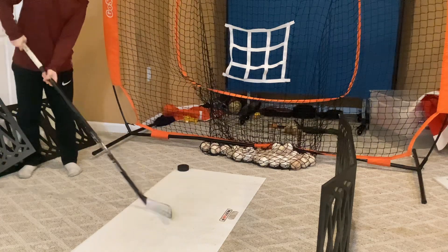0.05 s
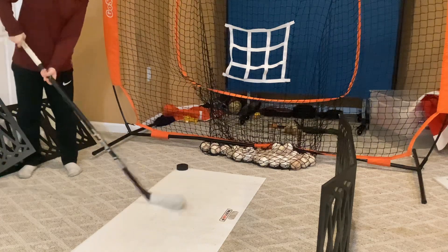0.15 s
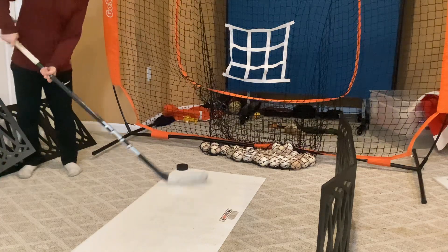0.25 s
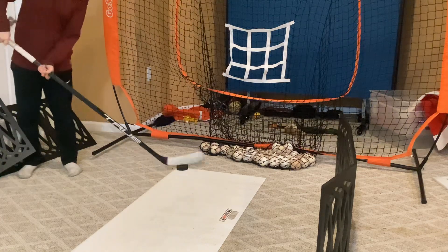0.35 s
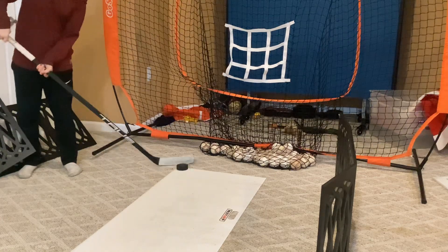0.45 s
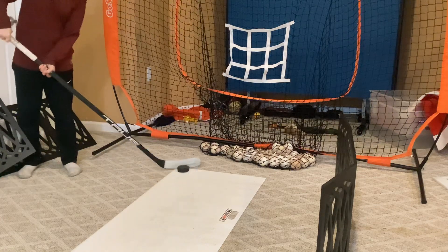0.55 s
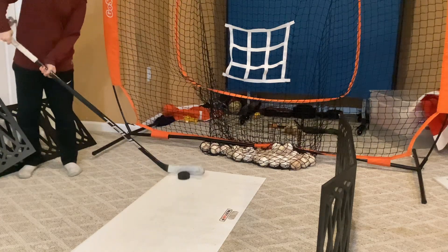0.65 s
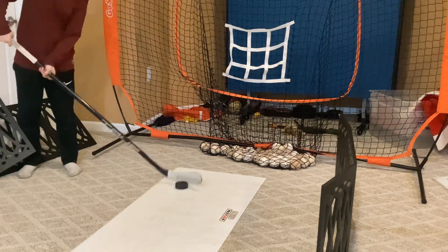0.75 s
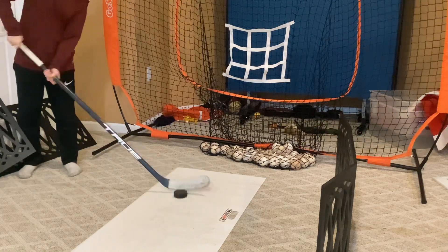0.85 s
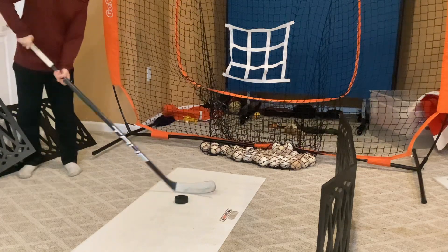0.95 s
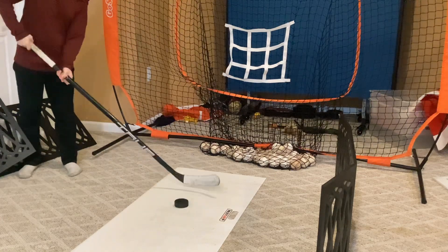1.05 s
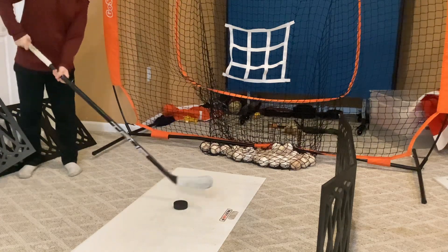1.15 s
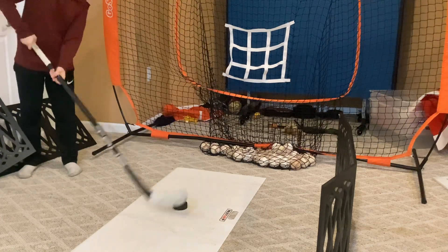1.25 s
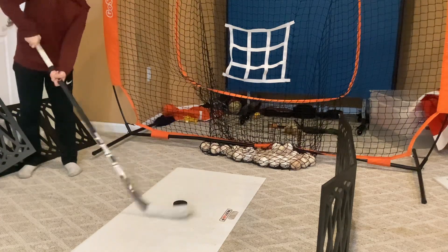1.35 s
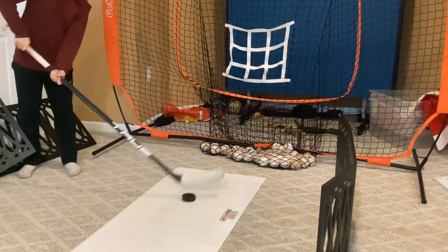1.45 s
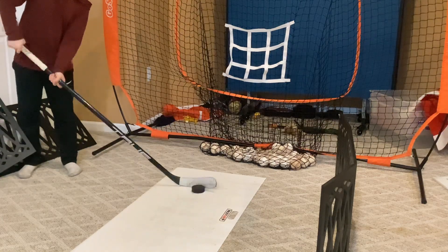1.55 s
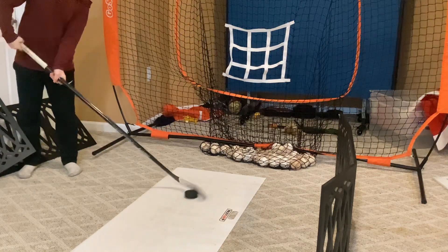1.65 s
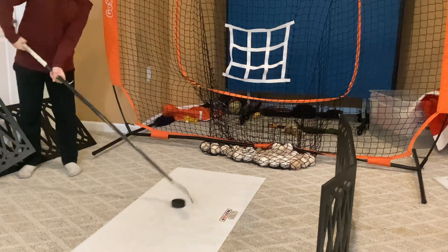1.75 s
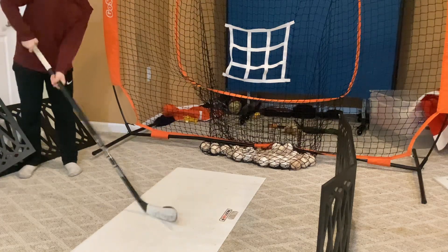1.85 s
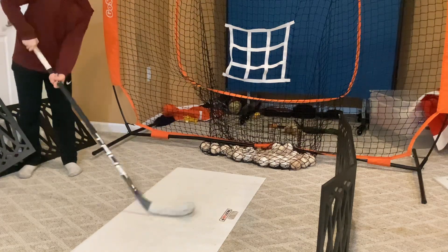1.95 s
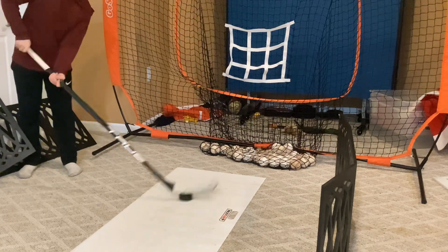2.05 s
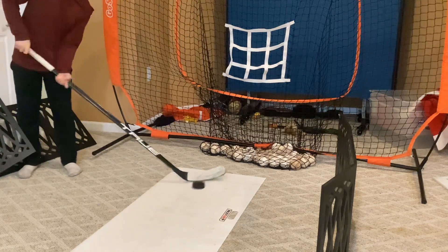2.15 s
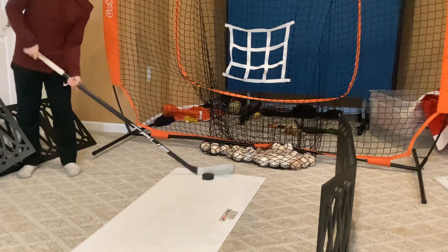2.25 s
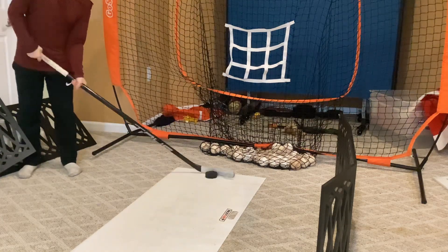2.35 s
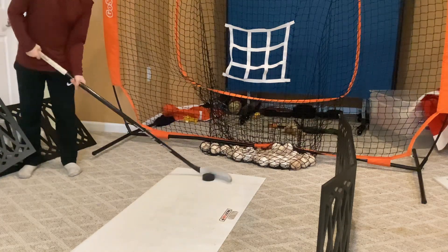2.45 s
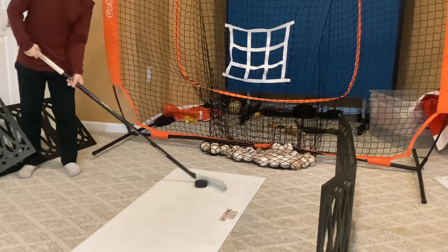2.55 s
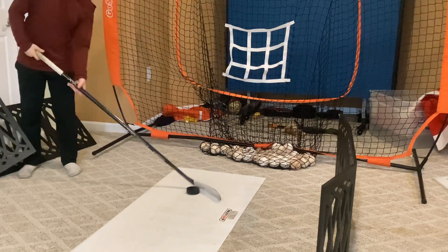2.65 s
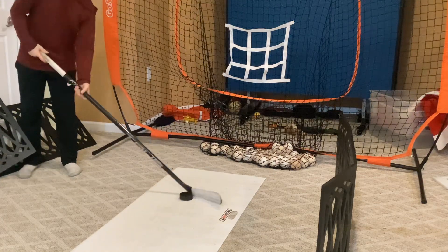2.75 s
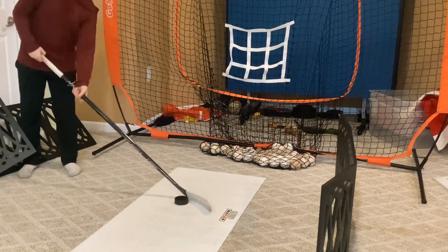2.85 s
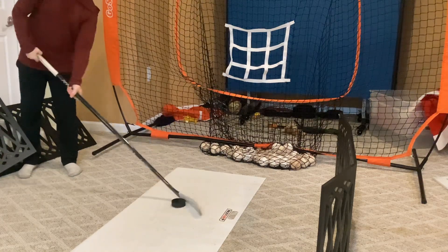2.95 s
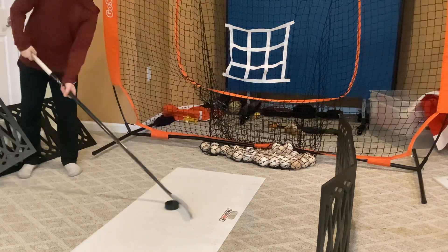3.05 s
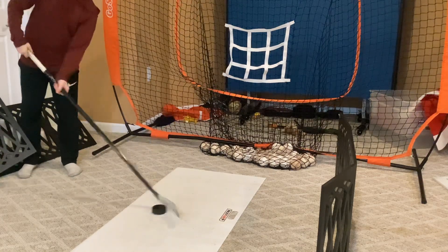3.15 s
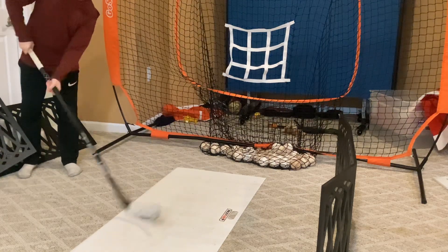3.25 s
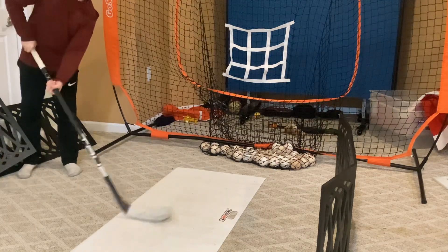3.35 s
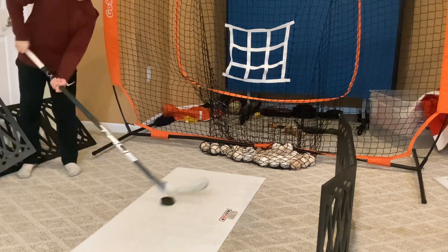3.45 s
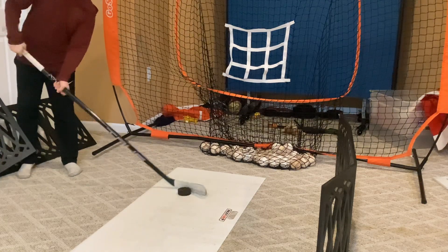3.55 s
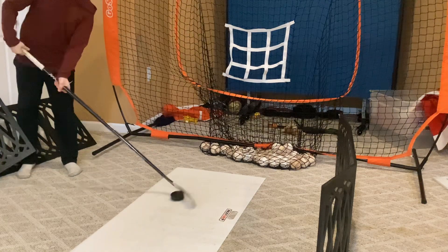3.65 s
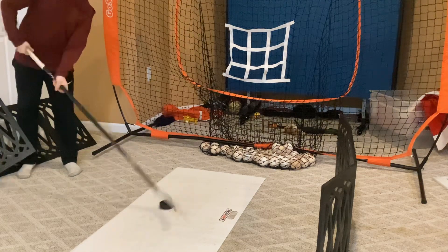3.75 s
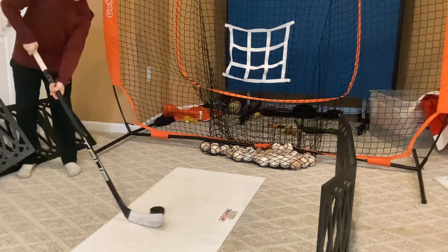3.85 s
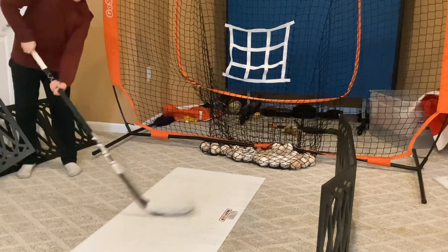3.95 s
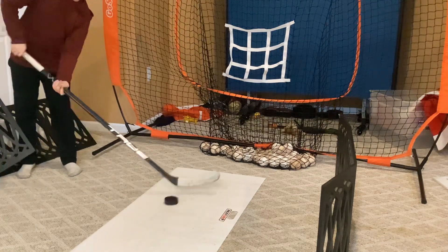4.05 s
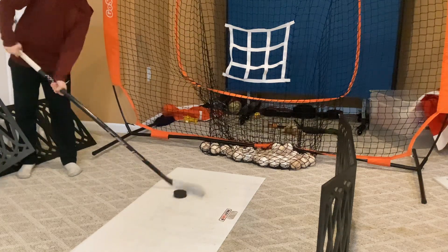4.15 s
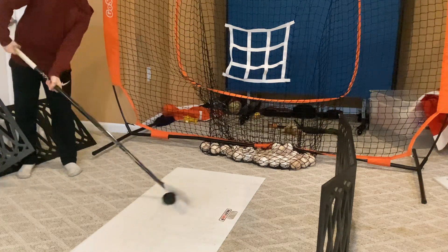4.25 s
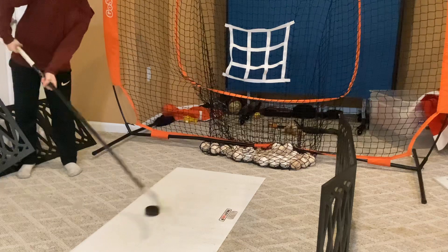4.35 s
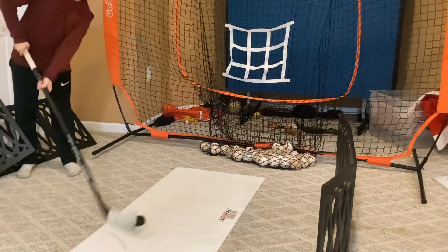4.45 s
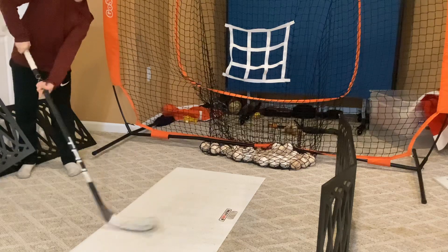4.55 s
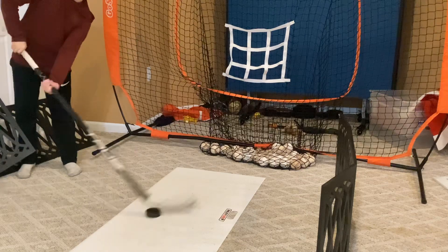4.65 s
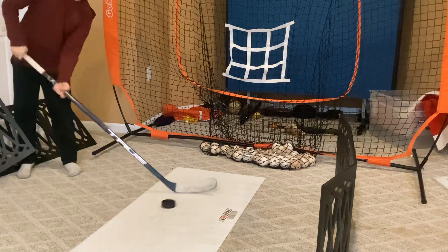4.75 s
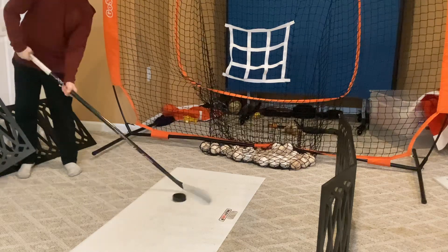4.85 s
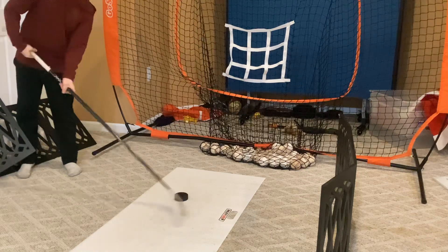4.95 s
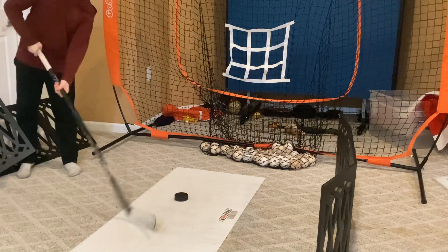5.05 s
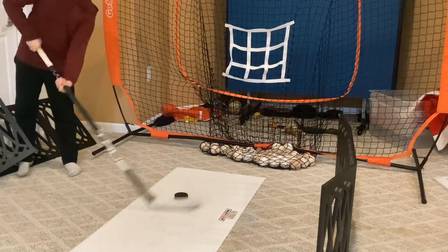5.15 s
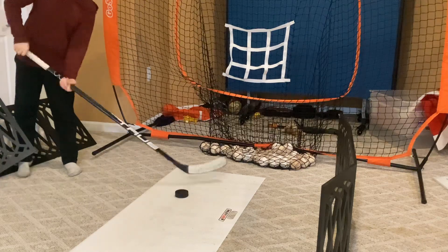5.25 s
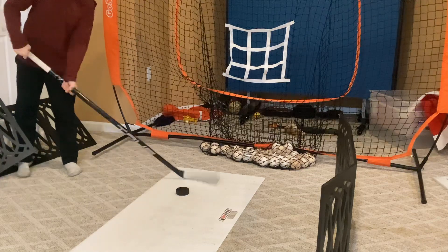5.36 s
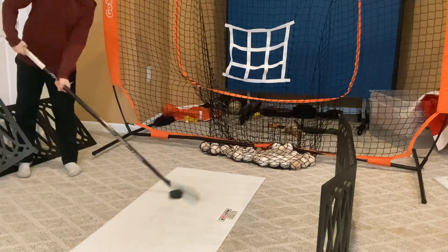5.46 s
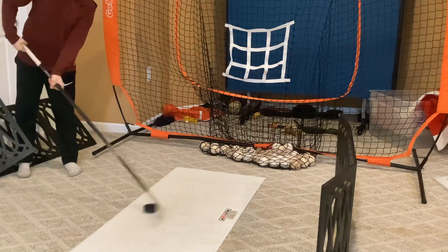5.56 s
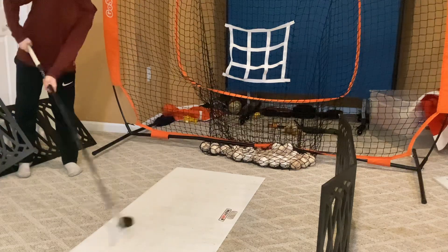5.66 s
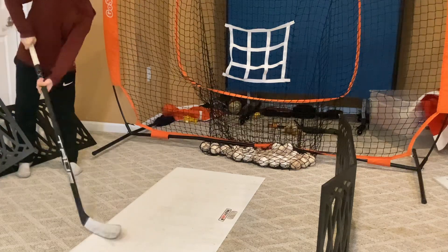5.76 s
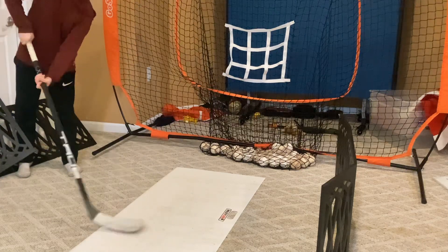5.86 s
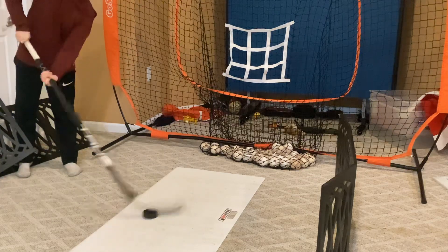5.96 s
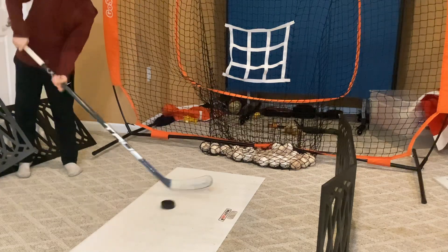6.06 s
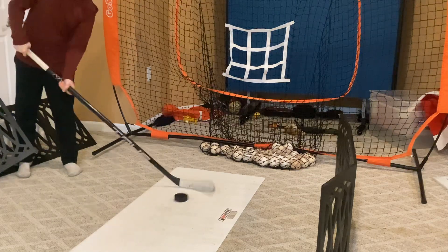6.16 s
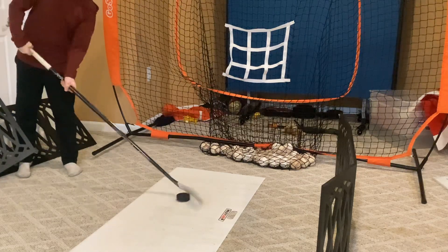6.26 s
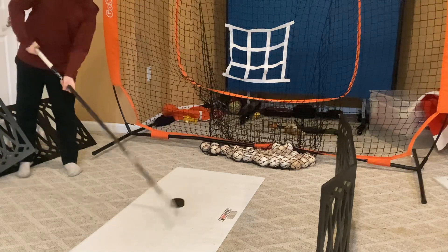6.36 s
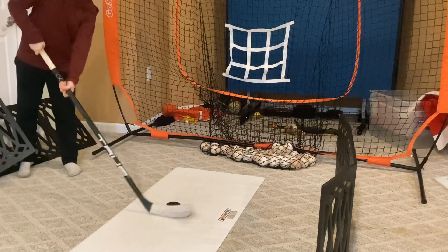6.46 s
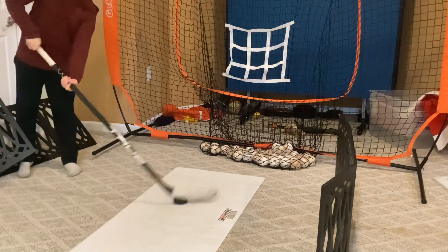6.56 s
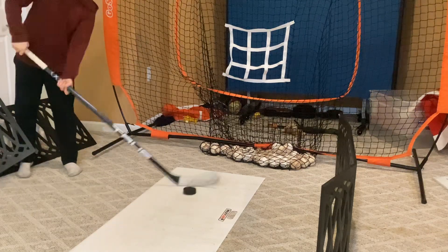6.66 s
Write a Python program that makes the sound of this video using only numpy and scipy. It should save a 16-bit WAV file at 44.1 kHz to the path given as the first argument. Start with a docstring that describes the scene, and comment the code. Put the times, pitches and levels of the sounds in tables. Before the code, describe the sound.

A hockey stick dribbles a puck on a plastic pad, heard from close by in a carpeted room with a short echo. It opens with faint sliding and a few light taps in the first second. From about 1.3 to 2.3 seconds come four firm slaps of the blade on the pad, each a bright crack with a low boom, most followed a moment later by a woody clack on the puck. A lull follows, with light ticks, quiet sliding and one faint, short rasp of the blade's edge near 2.8 seconds. At 3.3 seconds the slaps and clacks return, about three pairs a second in an uneven rhythm, and continue to a last strong slap near 6.7 seconds. Between blows, puck and blade hiss finely over the plastic and the wobbling puck bumps softly. A foot thuds gently on the floor, most noticeably around 4.8 seconds.

```python
"""Stickhandling in a carpeted room

One microphone, close to a plastic pad on which a hockey stick dribbles a puck from side to side.
The blade slaps the pad (a bright crack, then a low boom) and a moment later knocks the puck (a woody
clack); the room answers briefly. Between blows puck and blade slide with a fine hiss, the wobbling
puck bumps softly, and once the blade's edge rasps. Behind them a foot thuds softly on the floor."""
import sys
import numpy as np
from scipy import signal
from scipy.fft import rfft, irfft
from scipy.io import wavfile

SR = 44100
rng = np.random.default_rng(int(sys.argv[2]) if len(sys.argv) > 2 else 0)


def bounce(signal):
    """Save signal as a 16-bit WAV file at the path given by the first command-line argument."""
    frames = np.transpose(np.atleast_2d(signal))
    limited = np.clip(frames, -1, 1)
    pcm = np.round(limited * 32767).astype(np.int16)
    wavfile.write(sys.argv[1], SR, pcm)


N = 295470
SIZE = 32768  # samples in the buffer of one blow
HZ, AGE = np.fft.rfftfreq(SIZE, 1 / SR), np.arange(SIZE) / SR
# the first row is a knock's fading tail; the others are puck and blade sliding:
# t/s, length/s, level/dB, rub offset/dB, hiss offset/dB
SWELLS = [(-0.1, 0.096, -45, 2, -1), (0.43, 0.32, -56, 5.5, 2.5), (0.733, 0.16, -63.5, -4, 16.5),
          (1.0, 0.13, -62.5, -7, -2), (1.377, 0.17, -54.5, -1, 6.5), (1.592, 0.34, -52.5, -1.5, 1),
          (1.926, 0.26, -55, -2, 9), (2.396, 0.34, -47, -5.5, 0), (2.733, 0.27, -52, -4, -3),
          (3.02, 0.44, -60, 0, 2.5), (3.373, 0.22, -52.5, 4, 5.5), (3.586, 0.37, -53, 6, -1),
          (3.947, 0.15, -58, -3, 8), (4.197, 0.19, -51, 4, -15), (4.434, 0.42, -56, 1.5, 7),
          (5.225, 0.18, -53, -10, -1), (5.45, 0.34, -53, 0, 6), (5.83, 0.28, -55.5, -1, 6.5),
          (6.23, 0.38, -53.5, 9.5, -1), (6.52, 0.16, -55.5, -10, 3)]


def slaps_and_bumps(thump_db=-15, snap_db_per_db=0.5):
    """Blade slaps on the pad, and a few soft low bumps of the wobbling puck."""
    # t/s, strength/dB, bass/dB, brightness/dB, hardness/dB; the bumps are at 3.47, 3.79, 4.37 and 4.43 s
    pad_rows = [(0.1373, -24, 1, -4.5, 6), (0.775, -28, 8, -9, 4), (0.9349, -9.5, -2, -0.5, 2.5),
                (1.3461, 1, -1.5, 0.7, 1.5), (1.5565, 1, 3.5, 2, 4), (1.8821, 1.1, 0.5, -2.5, 0),
                (2.1952, -3.5, -1.5, 1, 2), (3.3134, 0, 0, -1.5, 0), (3.468, -26, 10, -5, 2),
                (3.5301, 2, 1, -0.6, -1), (3.7903, -33.5, 16, -12, 3), (3.8623, -2, 4.5, 0, -1),
                (4.1243, 1, 1.5, 1, 1.5), (4.3714, -24, 10, 0, 0), (4.4345, -24, 8, -8, 8),
                (4.517, 1, -1, -0.8, -0.5), (4.7903, 0, 0.5, 1.5, 2), (5.0978, -3.5, 3, 0.4, 6.5),
                (5.3378, 0.5, 0.8, 1.5, -6.5), (5.723, -3, -3, 2.5, 2), (6.12, -2.5, 0.5, 3.5, -1),
                (6.429, 1, -0.5, 2, 0.5), (6.692, 4, 0.5, -2, 3.5)]
    # spectra sent straight to the microphone (crack) and round the room (body): f/Hz, level/dB
    pad_crack = [(40, 2.5), (100, 4), (200, 23.5), (600, 15), (1100, 15.5), (1450, 10), (2200, 11),
                 (5800, 6), (9000, 3.5), (12000, 15.5), (14200, 17), (16000, 3)]
    pad_body = [(40, 2.5), (100, 21), (200, 31.5), (320, 25.5), (600, 22), (1100, 21), (1450, 15),
                (2200, 13), (5800, 10), (6600, 2.5), (9800, 4.5), (11500, 11.5), (13000, 8.5), (16000, -7)]
    out = np.zeros(N)
    for s, db, bass_db, bright_db, hard_db in pad_rows:
        add(out, s, pad_thump(thump_db + db + bass_db))
        tint_db = db + blow_colour(bass_db, bright_db, bright_db)
        # the top of the crack grows faster with strength than the rest
        edge_db = read([(6000, hard_db), (11000, snap_db_per_db * db)], HZ)
        add(out, *blow(s, read(pad_crack, HZ) + tint_db + edge_db - 3,
                       read(pad_body, HZ) + tint_db - 0.83,
                       lag_s=0.0011, grit_s=0.0003, grit_hz=4940, modal_share=0.47))
    return out


def knocks_and_rasp(peak_octaves=0.3):
    """Blade knocks on the puck, and one short rasp of the blade's edge near 2 kHz."""
    # t/s, strength/dB, bass/dB, bite/dB, fizz/dB, resonance f/Hz, its boost/dB; the rasp is at 2.78 s
    blade_rows = [(0.4, -22, -4, 2.5, -2, 1640, 4.9), (0.4518, -36.5, 10.5, 3, 20, 480, 16),
                  (0.5372, -9.5, -5.5, 0.3, -2, 1130, 7.5), (0.7972, -19, 9.5, -0.3, -9, 1640, 9.5),
                  (1.42, -0.1, -1.5, -0.4, -4, 1760, 2.5), (1.585, 1.5, -12, 4.5, 5, 1230, 11),
                  (2.3026, -4.5, -1, -2, -3, 1660, 3), (2.4065, -37, -5, 7, 15, 2900, 9),
                  (2.4763, -19, -3, 2, 9, 3300, 3), (2.5879, -24.5, 3.5, 0, 4, 1860, 11),
                  (2.779, -30.5, -22, 8.5, 2, 1730, 17), (3.3672, -2.5, -1.5, -6.5, 5, 3500, 10.5),
                  (3.583, 4.5, -8, -4, -20, 2670, 3.5), (3.9464, -2.5, 3, -1.5, 1.5, 1980, 4),
                  (4.202, 0.5, 2, -1, 6.5, 910, 6), (4.5534, -1.5, -30, 0.5, 0, 2800, -1.5),
                  (4.9188, -4.5, 4.5, 3, -9, 383, 2), (5.163, -18, -5, 5.5, 21, 4540, 8.5),
                  (5.2168, -6, 7.5, 0.5, -9, 580, 3), (5.4539, 1.5, 2.5, 1, 1.5, 600, 1.5),
                  (6.2432, 0.5, 3, 2, 7.5, 2300, -1), (6.518, -1.9, 2, -5.5, 1, 1520, 5)]
    # spectra sent straight to the microphone (crack) and round the room (body): f/Hz, level/dB
    blade_crack = [(40, -9.5), (210, 5), (650, 19.5), (1000, 19), (1500, 11.5), (2300, 15), (4200, 3),
                   (5800, -0.5), (10500, -8), (13000, -16), (16000, -32)]
    blade_body = [(40, -11.5), (100, 13.5), (210, 24), (350, 21), (650, 21), (1000, 22), (1500, 11),
                  (2300, 11.5), (4200, 1.5), (5800, 7), (6600, -3), (12000, -11), (16000, -34)]
    out = np.zeros(N)
    for s, db, bass_db, bite_db, fizz_db, peak_hz, peak_db in blade_rows:
        resonance_db = peak_db / (1 + (np.log2((HZ + 1) / peak_hz) / peak_octaves) ** 2)
        tint_db = db + resonance_db + blow_colour(bass_db, bite_db, fizz_db)
        hard_db = 1.5 + 0.32 * db  # a gentle touch only grazes: it loses more crack than ring
        add(out, *blow(s, read(blade_crack, HZ) + tint_db + hard_db - 1.34,
                       read(blade_body, HZ) + tint_db - 0.4,
                       lag_s=0.000616, grit_s=0.001, grit_hz=6700, modal_share=0.68))
    return out


def blow(s, crack_db, body_db, lag_s, grit_s, grit_hz, modal_share, modal_hz=1250, lead_s=0.002):
    """Start time and sound of a blow at the microphone: gritty contact, echoes, modes, reverberation."""
    impulse = np.exp(-2j * np.pi * HZ * lead_s)
    # the surfaces meet at many tiny points, which smears the highest treble in time
    grit = rfft(rng.standard_normal(SIZE) * np.exp(-abs(AGE - lead_s) / grit_s))
    contact = blend(impulse, evened(grit), HZ ** 2 / (HZ ** 2 + grit_hz ** 2))
    contact = evened(contact / np.sqrt(abs(contact) + 1e-3))
    crack = contact * causal(crack_db) * (1 + wall_echoes())
    # single modes stand out below modal_hz; above it they merge into a cloud
    tail = blend(reverberation(), ringing(), modal_share / (1 + (HZ / modal_hz) ** 8))
    body = impulse * tail * causal(body_db)
    # low bending waves travel slowest; lag_s is their delay near 1 kHz
    chirp = np.exp(-2j * np.pi * lag_s * 1000 * np.log(HZ + 100))
    return s - lead_s, irfft(chirp * (crack + body))[:SIZE * 3 // 4]


def blow_colour(bass_db, bite_db, fizz_db, ripple_db=3.5, ripple_hz=210):
    """A blow's tone in dB, rippled by the hollow blade's upper modes: each spot favours others."""
    tone_db = read([(260, bass_db), (550, 0), (1300, 0), (2100, bite_db), (5500, bite_db),
                    (10000, fizz_db)], HZ)
    knots = np.arange(0, SR / 2, ripple_hz)
    heights = np.minimum(rng.standard_normal(SIZE)[:len(knots)], 1.4)
    return tone_db + ripple_db * np.interp(HZ, knots, heights) * HZ ** 2 / (HZ ** 2 + 1000 ** 2)


def pad_thump(db, hz=210, swell_s=0.01225, width_s=0.0049, sag_octaves_per_s=25, spread=0.12):
    """The pad gives under a blow: a few low cycles that swell, sag in pitch and are gone."""
    pitch = hz * np.exp(spread * rng.standard_normal()) * 2 ** (-sag_octaves_per_s * (AGE - swell_s))
    swell = np.exp(-((AGE - swell_s) / width_s) ** 2)
    return amp(db) * swell * np.sin(2 * np.pi * np.cumsum(pitch) / SR)


def ringing(spread_db=4.0, detune=0.0052):
    """Spectrum of the modes a blow rings; their shares change with the spot that is struck."""
    # resonances of stick, pad and room: f/Hz, level/dB, t60/s
    mode_rows = [(75, -6, 0.6), (123.9, 4, 0.31), (178.2, -1, 0.37), (222.5, 3, 0.2), (254, 2.5, 0.2),
                 (350.4, 3.5, 0.19), (426.5, 4, 0.2), (456.6, 2.5, 0.22), (581, 0.5, 0.27), (601, 1, 0.17),
                 (699, -1, .3), (751, -7, 0.39), (812, 2, 0.2), (941, -1, 0.29), (972, 2.5, 0.23),
                 (1063, 4.5, 0.15), (1137, 3, 0.16), (1160, 9.5, 0.14)]
    hz, db, t60 = np.transpose(mode_rows)[:, :, None]
    size, shift = rng.standard_normal((2, len(mode_rows), 1))
    t = AGE[:SIZE // 2]
    sign = (-1) ** np.arange(len(mode_rows))[:, None]  # neighbours oppose, so the boom swells
    envelopes = amp(db + spread_db * size - 60 * t / t60)
    waves = sign * envelopes * np.sin(2 * np.pi * hz * (1 + detune * shift) * t)
    spectrum = rfft(waves.sum(0), SIZE)
    in_band = (HZ > hz.min()) & (HZ < hz.max())
    return spectrum / np.sqrt(np.mean(abs(spectrum[in_band]) ** 2))


def sliding():
    """Puck and blade rub, scrape and hiss on the pebbled plastic; the opening swell is a knock's tail."""
    # spectra of the three: f/Hz, relative density/dB
    rub_colour = [(90, -24), (200, 9.5), (350, 7.5), (600, 1.5), (1100, 2.5), (1600, -18.5), (3000, -35)]
    scrape_colour = [(700, -12), (1400, -0.5), (2000, 2), (2700, -2), (3600, -2.5), (5800, -7), (6500, -11),
                     (10000, -15.5)]
    hiss_colour = [(3000, -13.5), (5700, -4), (6500, -12), (10800, -5), (11700, 1), (13200, -1),
                   (14500, -1), (15600, -11.5), (16300, -37)]
    _, _, db, rub_db, hiss_db = np.transpose(SWELLS)
    rub = friction(rub_colour, catches_per_s=110, catch_share=0.65, judder_db=1.0)
    scrape = friction(scrape_colour, catches_per_s=750, catch_share=0.34, judder_db=3.0)
    hiss = friction(hiss_colour, catches_per_s=1400, catch_share=0.33, judder_db=1.4)
    return (rub * swelling(db + rub_db, rise_s=0.045)
            + scrape * swelling(db, rise_s=0.05)
            + hiss * swelling(db + hiss_db, rise_s=0.1))


def friction(spectrum, catches_per_s, catch_share, judder_db, judder_hz=45):
    """Countless tiny slips and a few larger catches, blurred by the room; the pressure judders."""
    t = np.arange(N) / SR
    caught = rng.random(N) < catches_per_s / SR
    catches = caught * rng.exponential(1, N) * rng.choice([-1, 1], N)
    catches += signal.oaconvolve(catches, irfft(reverberation()))[:N]
    slips = blend(rng.standard_normal(N), evened(catches), catch_share)
    judder = judder_db * np.interp(t * judder_hz, np.arange(N), rng.standard_normal(N))
    return coloured(slips, spectrum) * amp(judder)


def swelling(levels_db, rise_s, sag_db_per_s=7, stop_db_per_s=185):
    """Gain of the swells: each rises, sags (in a slide, as the puck slows) and dies with the room."""
    t, power = np.arange(0, 1, 1 / SR), np.zeros(N)
    for (start, length, *_), db in zip(SWELLS, levels_db):
        fade_db = sag_db_per_s * t + stop_db_per_s * np.maximum(t - length, 0)
        swell = np.minimum(t / rise_s, 1) * amp(db - fade_db)
        add(power, start, swell[start + t >= 0] ** 2)
    return np.sqrt(power)


def footfalls(floor_hz=72, ring_s=0.047, rise_s=0.0037):
    """A stockinged foot rings the floor's lowest mode."""
    # the player's weight shifts: t/s, level/dB
    step_rows = [(.1, -49), (2.903, -44), (4.83, -34)]
    thud = np.sin(2 * np.pi * floor_hz * AGE) * np.exp(-AGE / ring_s) * (1 - np.exp(-AGE / rise_s))
    out = np.zeros(N)
    for s, db in step_rows:
        add(out, s, amp(db) * thud)
    return out


def wall_echoes(wander_s=0.000311, dull_hz=13000):
    """Spectrum of the first reflections to reach the microphone, dulled by the walls."""
    # delay/s, level/dB
    echo_rows = [(.0053, -13), (.0097, -12), (0.0131, -10), (0.018, -13)]
    reflections = sum(amp(db) * np.exp(-2j * np.pi * HZ * (delay + wander_s * rng.standard_normal()))
                      for delay, db in echo_rows)
    return reflections / (1 + 1j * HZ / dull_hz)


def reverberation(rise_s=0.00083, lumpy_db=1.0):
    """Spectrum of a fresh cloud of reflections, each band dying at its own speed."""
    # decay of the carpeted room: f/Hz, t60/s
    decay_times = [(100, 0.44), (300, 0.3), (1000, 0.35), (2500, 0.32), (6000, 0.29), (12000, 0.35),
                   (16000, 0.25)]
    taps = rng.standard_normal(SIZE) * amp(lumpy_db * np.repeat(rng.standard_normal(SIZE // 32), 32))
    hz, t, bands = signal.stft(taps, SR, nperseg=256)
    bands *= amp(-60 * t / read(decay_times, hz)[:, None])
    tail = signal.istft(bands, SR, nperseg=256)[1][:SIZE]
    return evened(rfft(tail * (1 - np.exp(-AGE / rise_s))))


def room_tone(db=-63):
    """The still room: a faint, low noise."""
    # f/Hz, relative density/dB
    still_colour = [(22, -53), (50, -7), (80, -1.5), (150, -5), (300, -13.5), (1000, -24), (4000, -35),
                    (15000, -44)]
    return amp(db) * coloured(rng.standard_normal(N), still_colour)


def amp(db):
    """Decibels to gain."""
    return 10 ** (np.asarray(db) / 20)


def evened(x):
    """Scales to rms 1."""
    return x / np.sqrt(np.mean(abs(x) ** 2) + 1e-20)


def read(points, hz):
    """Joins (f/Hz, value) points on a log-frequency axis."""
    f, value = np.transpose(points)
    return np.interp(np.log(hz + 1), np.log(f + 1), value)


def add(mix, s, sound):
    """Mixes a sound in at time s."""
    part = mix[max(round(s * SR), 0):][:len(sound)]
    part += sound[:len(part)]


def causal(db):
    """The response with this gain that starts at once and rings afterwards."""
    cepstrum = irfft(np.log(amp(np.maximum(db, -100))))
    cepstrum[1:SIZE // 2] *= 2
    cepstrum[SIZE // 2 + 1:] = 0
    return np.exp(rfft(cepstrum))


def coloured(x, spectrum):
    """Gives a long signal a spectrum, at rms 1."""
    gain = amp(read(spectrum, np.fft.rfftfreq(N, 1 / SR)))
    return evened(irfft(rfft(x) * gain, N))


def blend(a, b, share):
    """Crossfades two unrelated signals at constant power."""
    share = np.clip(share, 0, 1)
    return np.sqrt(1 - share) * a + np.sqrt(share) * b


def scene():
    """Blows up front, sliding and steps beneath them, room tone behind; mono."""
    return (slaps_and_bumps() + knocks_and_rasp() + sliding() + footfalls() + room_tone())[None]


def record(dry, ceiling=0.88, edge_hz=16500):
    """The microphone chain rounds off the loudest peaks, then cuts the highest treble."""
    rounded = dry / (1 + (dry / ceiling) ** 6) ** (1 / 6)
    band_limit = signal.firwin(255, edge_hz, window=("kaiser", 8), fs=SR)
    return signal.oaconvolve(rounded, band_limit[None], "same")


dry = scene()
out = record(dry)
bounce(out)
```